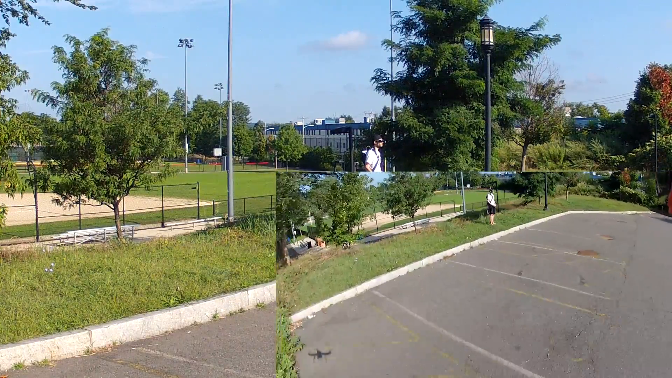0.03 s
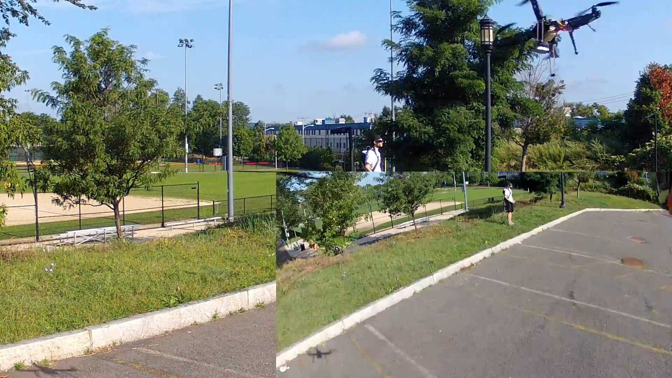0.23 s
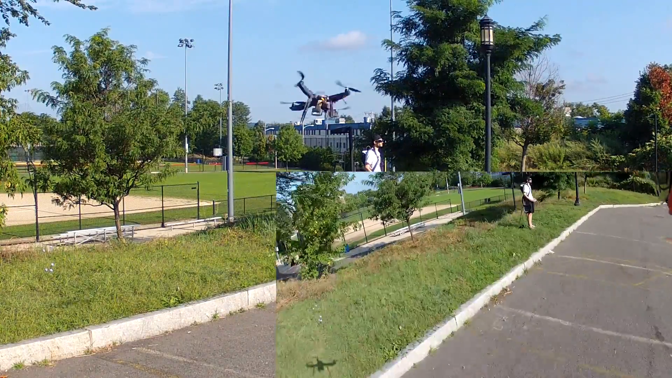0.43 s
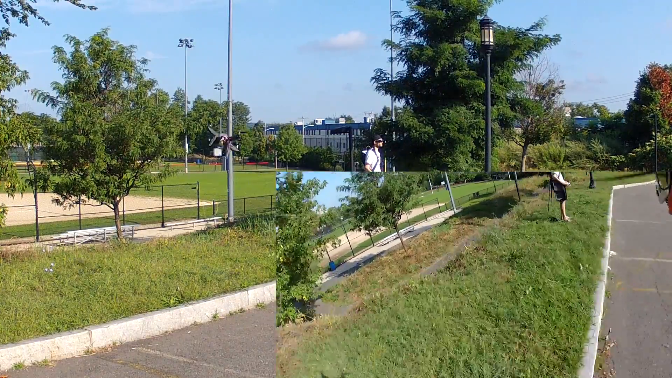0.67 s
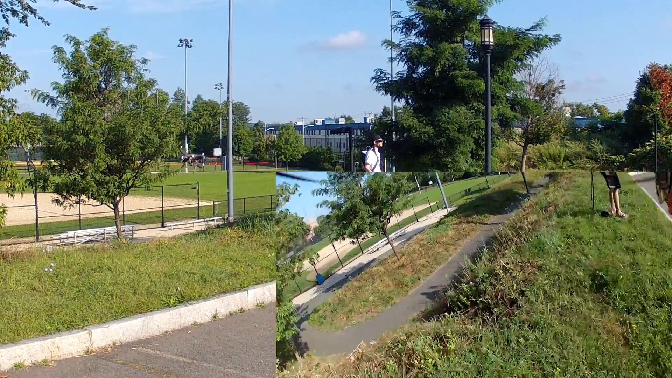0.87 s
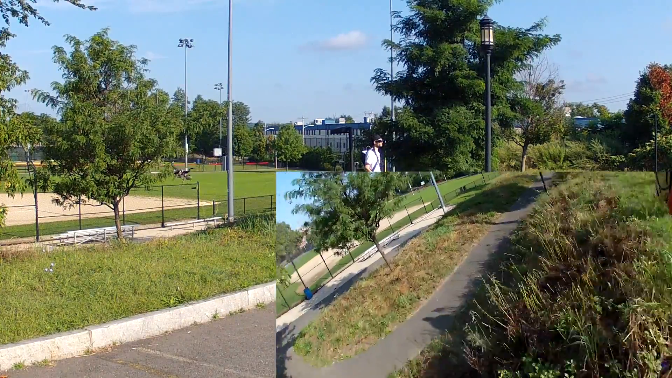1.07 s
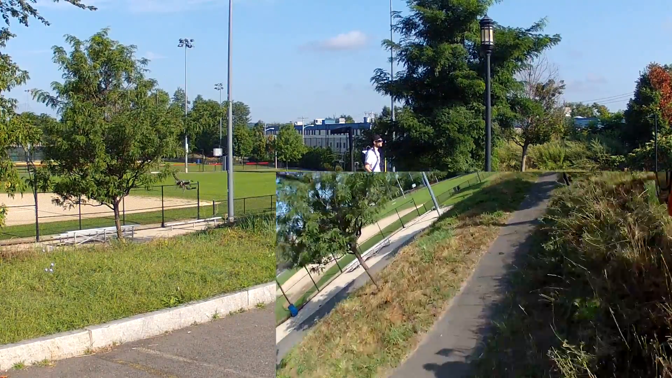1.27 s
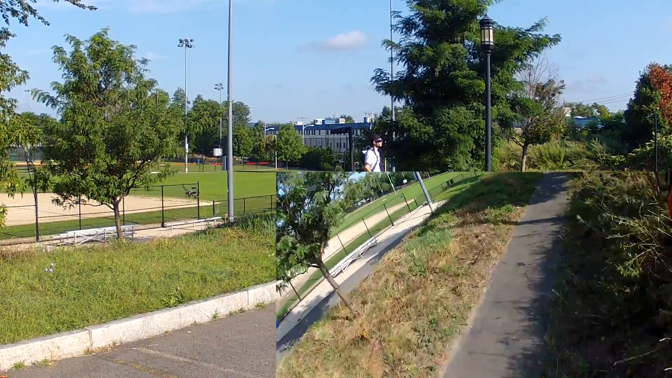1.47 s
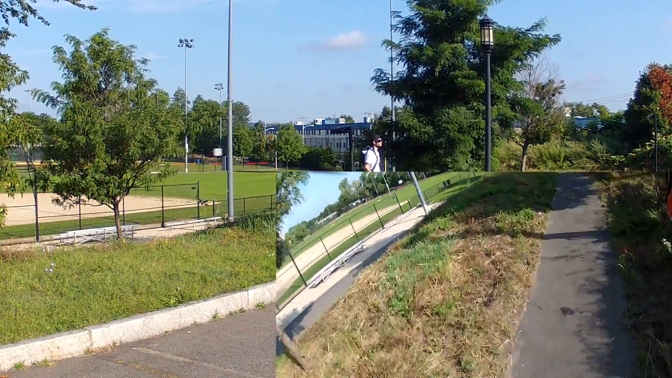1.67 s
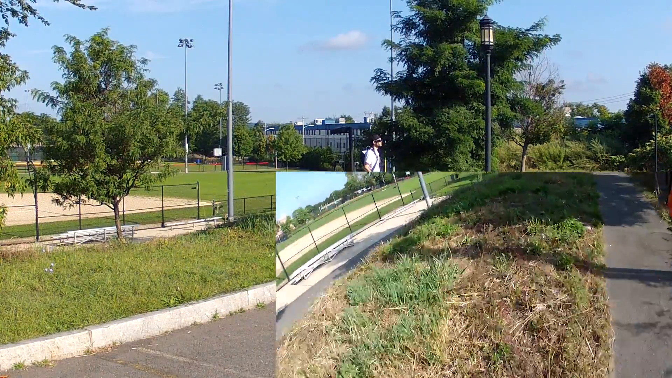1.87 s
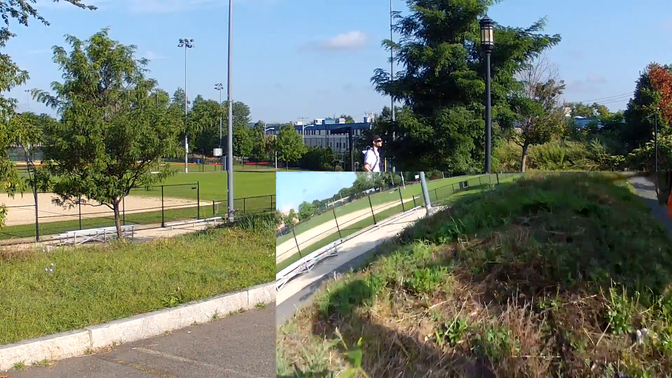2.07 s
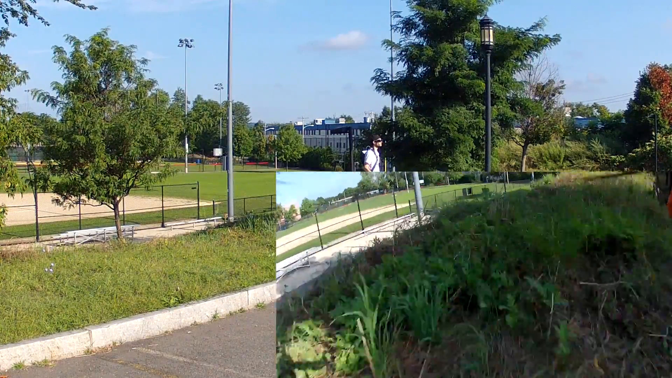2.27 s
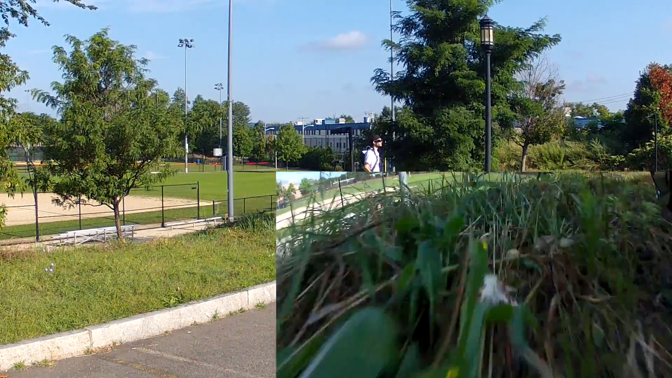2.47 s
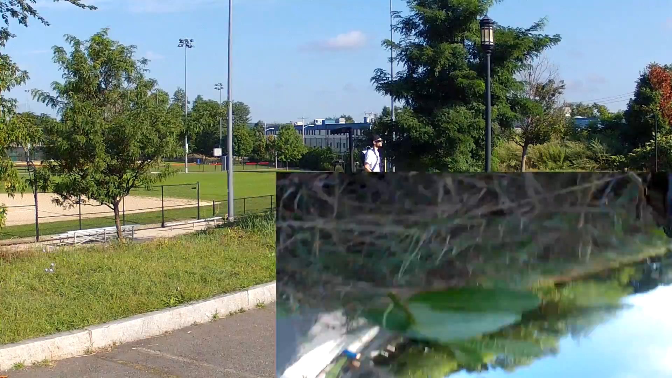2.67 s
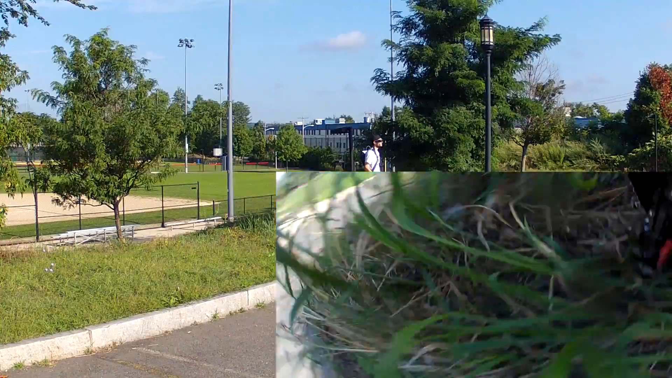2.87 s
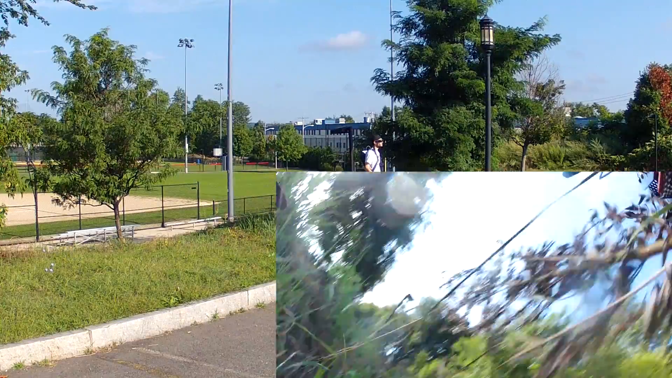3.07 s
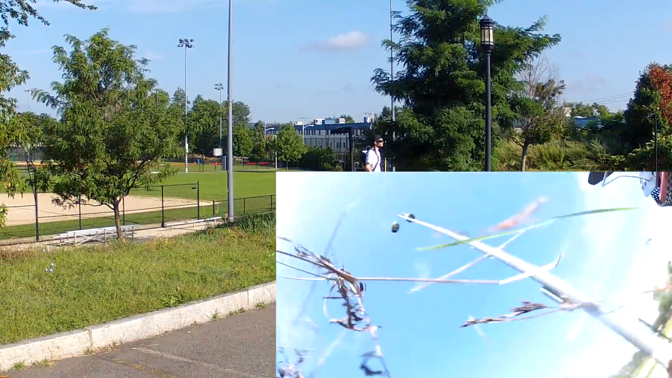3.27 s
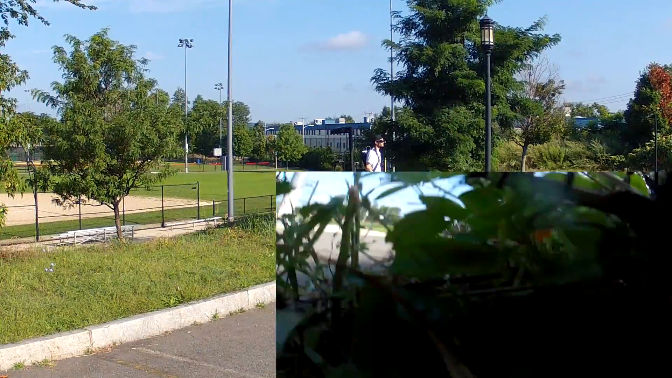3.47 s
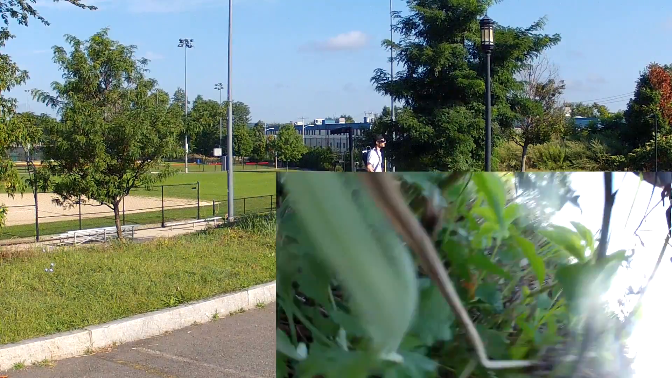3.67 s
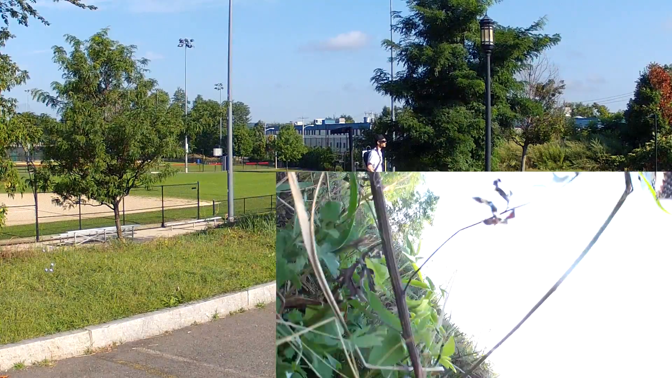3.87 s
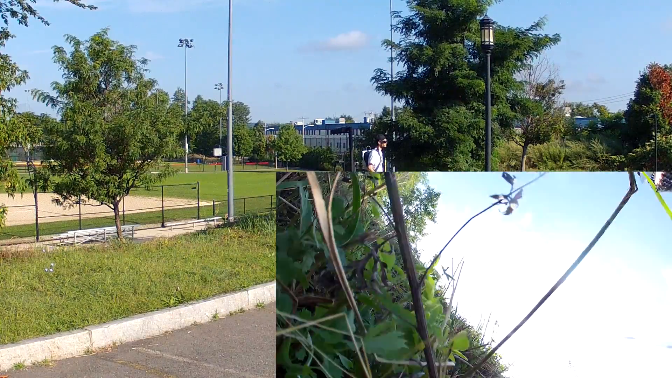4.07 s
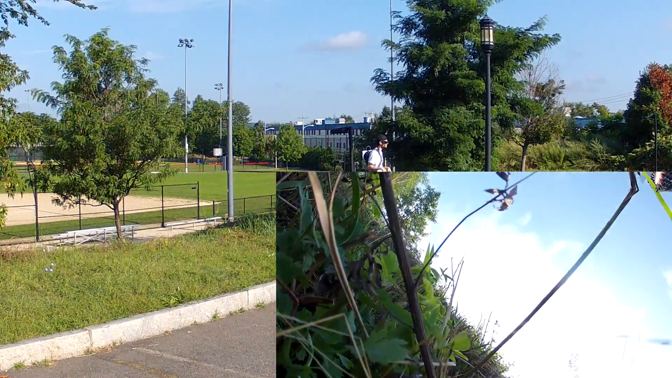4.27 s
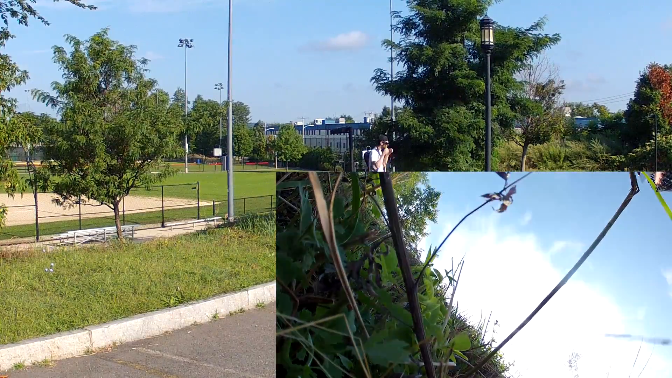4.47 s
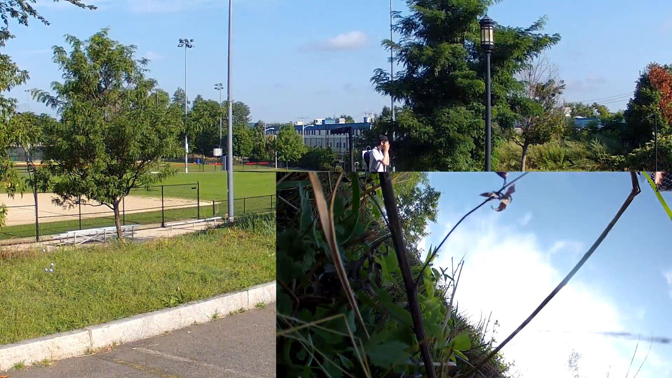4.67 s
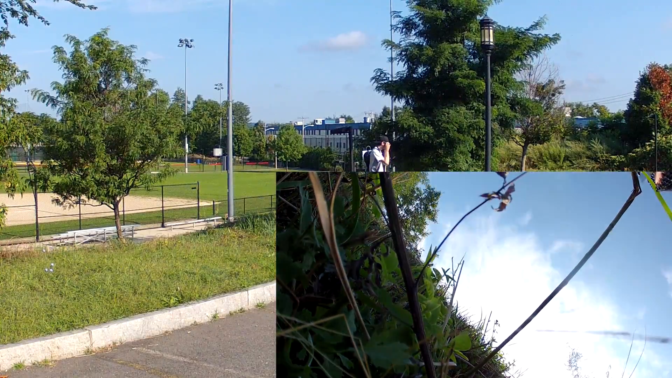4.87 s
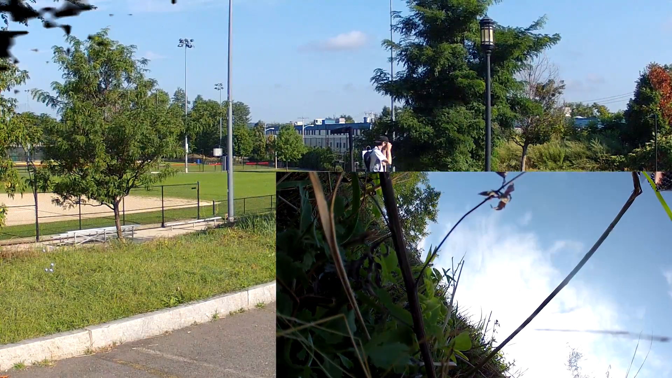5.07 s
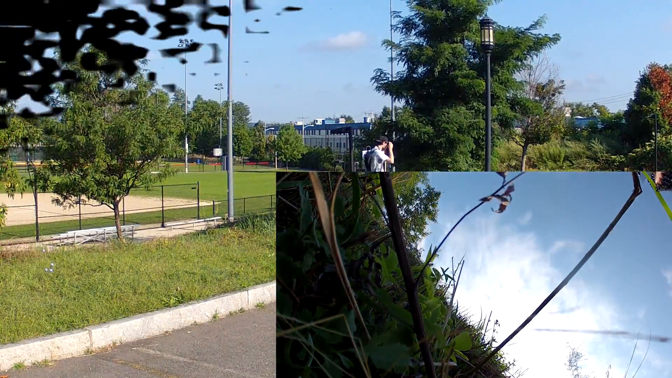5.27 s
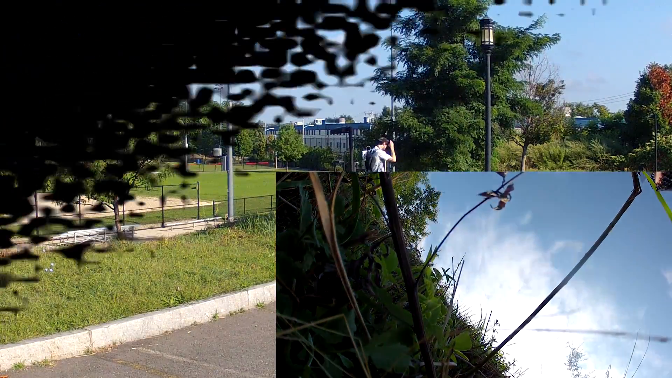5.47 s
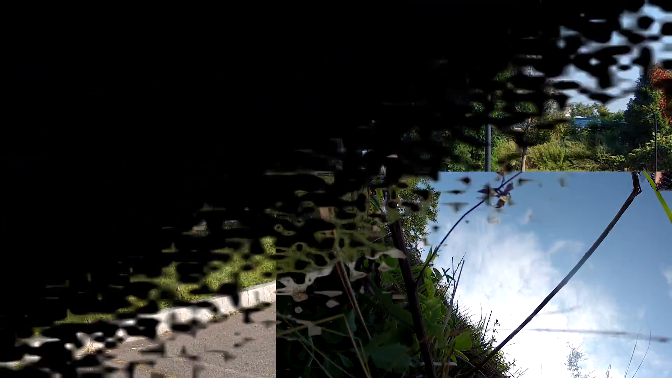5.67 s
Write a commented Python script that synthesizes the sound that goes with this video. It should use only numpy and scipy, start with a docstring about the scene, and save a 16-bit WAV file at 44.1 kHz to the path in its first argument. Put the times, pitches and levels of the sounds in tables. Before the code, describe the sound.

Close, gritty, overloaded onboard sound outdoors in a park. Two slightly detuned rotors drone under buffeting air and casing hiss, thumping now and then. Stems snap sharply on impact, plants scrape the plastic, low knocks tumble unevenly, and rotors sputter twice. A last heavy crack and rustles end it near four seconds, leaving very quiet distant rumble, high thin buzzing and soft falling chirps.

```python
"""A park, heard by a small camera on a quadcopter: blade hum and buffeting air, then a tumble through grass
and brush, then quiet with a thin buzz and a cricket. Rotors are harmonics of the blade pass; air, plants and
park are shaped noise; blows are short bursts and pushes. The camera samples sound slowly and holds each value,
which mirrors the spectrum into the treble."""
import sys
import numpy as np
from scipy import signal
from scipy.fft import rfft, irfft, next_fast_len
from scipy.io import wavfile
from scipy.ndimage import uniform_filter1d

SR = 44100
rng = np.random.default_rng(int(sys.argv[2]) if len(sys.argv) > 2 else 0)


def master_out(mix):
    """Clip the mix to full scale and print it as 16-bit PCM to the path in sys.argv[1]."""
    frames = np.transpose(np.atleast_2d(mix))
    ceiling = np.clip(frames, -1, 1)
    pcm = np.round(ceiling * 32767).astype(np.int16)
    wavfile.write(sys.argv[1], SR, pcm)


N = 252043
T = np.arange(N) / SR
CASING_HZ, CASING_WIDTH_HZ = 1070, 170
# spectrum of plants on the casing: freq_hz, density_db
SCRAPE_SPECTRUM = [(290, -34), (500, -17.5), (875, -6), (1070, -6), (1340, -9), (1840, -12), (4460, -11),
                   (5700, -15.5)]


def amp(db):
    """Amplitude ratio of a level in dB."""
    return 10 ** (np.asarray(db) / 20)


def evened(x):
    """x at unit RMS."""
    return x / np.sqrt(np.mean(x ** 2) + 1e-20)


def add(mix, start_s, sound):
    """Add sound into mix in place, cut at the end."""
    part = mix[round(start_s * SR):][:len(sound)]
    part += sound[:len(part)]


def curves(rows):
    """A mask that is 1 while the table lasts, and the table's columns at every sample."""
    s, *columns = np.transpose(rows)
    inside = uniform_filter1d(1. * ((T > s[0]) & (T < s[-1])), size=600, mode="nearest")
    return inside, [np.interp(T, s, column) for column in columns]


def coloured(x, spectrum):
    """x filtered by a spectrum given as points, at unit RMS."""
    point_hz, point_db = np.transpose(spectrum)
    size = next_fast_len(len(x))
    hz = np.fft.rfftfreq(size, 1 / SR)
    gain_db = np.interp(np.log(hz + 1), np.log(point_hz + 1), point_db)
    return evened(irfft(rfft(x, size) * amp(gain_db), size)[:len(x)])


def resonate(x, hz, width_hz):
    """A two-pole resonance of peak gain 1."""
    return signal.lfilter(*signal.iirpeak(hz, hz / width_hz, SR), x)


def lumps(per_s, depth_db):
    """A gain that wanders about per_s times a second."""
    knots = rng.standard_normal(2000)
    return amp(depth_db * np.interp(T * per_s % 1999, np.arange(2000), knots))


def crackle(per_s, spread_db):
    """Random clicks, a few of them large, at unit RMS."""
    chance = rng.random(N)
    size = rng.exponential(1, N)
    sign = rng.choice([-1., 1.], N)
    return evened((chance < per_s / SR) * sign * amp(spread_db * np.minimum(size, 4)))


def park_wash():
    """Distant wash: noise of the park's spectrum, slightly uneven."""
    # freq_hz, density_db
    park_spectrum = [(12, -54.5), (20, -25.5), (69, -1.5), (177, -8), (212, -7), (267, -10), (299, -6.5),
                     (385, -13), (821, -16), (3100, -30), (4800, -28), (6240, -50), (10600, -120)]
    return amp(-56.5) * coloured(rng.standard_normal(N) * lumps(12, 0.57), park_spectrum)


def thin_buzz():
    """High harmonics of a steady pulse rate, each wavering in level, with a band of hiss around them."""
    # multiple of pulse rate, level_db
    buzz_partials = [(32, -85), (34, -86), (36, -84), (38, -84), (39, -76), (40, -79), (41, -68), (42, -72),
                     (43, -70), (44, -69), (45, -69), (46, -76), (47, -70)]
    pulse_rate_hz = 125.8
    hiss_hz, hiss_width_hz, hiss_db = 5350, 600, -69
    out = np.zeros(N)
    for k, db in buzz_partials:
        wave = np.cos(2 * np.pi * round(k) * pulse_rate_hz * T + .6 * k ** 2)
        out += np.sqrt(2) * amp(db) * lumps(15, 1.5) * wave
    hiss = resonate(rng.standard_normal(N), hiss_hz, hiss_width_hz)
    return out + amp(hiss_db) * evened(resonate(hiss, hiss_hz, 1500.))


def cricket():
    """Chirps of short pulses that fall in pitch; pulses tend to strengthen through a chirp."""
    # start_s, pulse count
    chirps = [(4.2, 3), (4.603, 2), (4.98, 3), (5.381, 3)]
    gap_s, gap_spread_s = .045, .003
    last_db, swell_db, spread_db = -61, 2.5, 1.5
    t = T[:1100]
    pulse = np.sin(2 * np.pi * np.cumsum(4560. - 12000 * t) / SR) * np.hanning(len(t))
    out = np.zeros(N)
    for start_s, count in chirps:
        for k in range(count):
            late, strong = rng.standard_normal(2)
            db = last_db + swell_db * (k + 1 - count) + spread_db * strong
            add(out, start_s + k * (gap_s + gap_spread_s * late), amp(db) * pulse)
    return out


def air(push):
    """Low buffeting, and hiss from turbulence puffed by every blade pass, which rings the casing."""
    # time_s, buffet_db, hiss_db
    air_levels = [(0.0, -28.5, -32), (.1, -22, -26.5), (.19, -21.5, -22), (.33, -20, -21),
                  (1.2, -19.5, -19.5), (1.65, -21.5, -23.5), (2.2, -19, -25.5), (2.5, -18.5, -25.5),
                  (2.58, -18.5, -32.5), (2.66, -17.5, -26.5)]
    # freq_hz, density_db
    buffet_spectrum = [(15, -45), (25, -23), (70, -9), (130, -5), (300, -7), (500, -10.5), (900, -16.5),
                       (1170, -39)]
    # freq_hz, density_db
    hiss_spectrum = [(410, -10.5), (700, -9.5), (890, -2.5), (1000, 0.5), (1360, -3), (2450, -5.5),
                     (5000, -13), (5700, -13.5)]
    puffs = np.exp(0.2 * evened(push))
    on, (buffet_db, hiss_db) = curves(air_levels)
    buffet = coloured(rng.standard_normal(N) * lumps(60, 2.14), buffet_spectrum)
    grit = rng.standard_normal(N) + 0.5 * crackle(1400, 3.76)
    hiss = coloured(grit * puffs * lumps(150, 0.83), hiss_spectrum)
    hiss += 0.1 * evened(resonate(hiss, CASING_HZ, CASING_WIDTH_HZ))
    return on * (amp(buffet_db) * buffet + amp(hiss_db) * hiss)


def motor_whines():
    """Thin sine whines, wavering in pitch and level, that fade in and out."""
    # pitch_hz, level_db, end_s
    whines = [(5290, -44, 1.75), (5630, -46, 2.5)]
    fade_s = 0.34
    out = np.zeros(N)
    for hz, db, end_s in whines:
        phase = 2 * np.pi * np.cumsum(hz * lumps(17, -0.4)) / SR
        fade = np.clip(np.minimum(T, end_s - T) / fade_s, 0, 1)
        out += fade * amp(db) * lumps(30, 3.8) * np.cos(phase)
    return out


def tumble():
    """Leaves and stems drag over the casing in dense uneven clicks; the frame carries a lumpy rumble."""
    # start_s, length_s, scrape_db, casing_ring_db, rumble_db
    contacts = [(2.628, .075, -8, -32, -14.5), (2.714, .075, -13, -15.5, -17.5),
                (2.814, .055, -29, -75, -39), (2.873, .05, -19, -22.5, -11), (2.943, .045, -21, -43, -25),
                (3.014, .075, -29.5, -38, -43), (3.084, 0.033, -48, -47, -25.5),
                (3.118, 0.038, -42.5, -49.5, -15.5), (3.198, .062, -35, -30.5, -23),
                (3.268, 0.043, -42.5, -49, -22), (3.338, 0.078, -41, -52, -19.5),
                (3.432, .052, -24.5, -28.5, -19), (3.498, .075, -16, -26.5, -21.5),
                (3.606, .07, -20, -30.5, -23.5), (3.697, .02, -18, -29, -15), (3.74, .035, -55, -46, -30.5),
                (3.776, .04, -25, -55, -31), (3.844, .03, -32.5, -53, -37.5),
                (3.896, .04, -27, -34.5, -27.5)]
    # freq_hz, density_db
    rumble_spectrum = [(15, -37.5), (25, -6), (179, -0.5), (405, -2), (525, -4.5), (647, -5.5),
                       (855, -12.5), (1040, -14.5), (1600, -26), (2080, -49), (3520, -120)]
    # scrape, casing ring, rumble: fast build-up and let-go [dB/s], then a fainter, slower tail [dB, dB/s]
    grab_db_per_s = np.array([800.5, 898.5, 1499.5])[:, None]
    release_db_per_s = np.array([802, 499.5, 902])[:, None]
    tail_db = np.array([-21.5, -22.5, -25.5])[:, None]
    tail_db_per_s = np.array([69.5, 90, 59])[:, None]
    t = T[::16]
    levels = np.zeros((3, len(t)))
    for start_s, length_s, *layer_db in contacts:
        before = np.maximum(start_s - t, 0)
        after = np.maximum(t - start_s - length_s, 0)
        decay_db = np.maximum(-release_db_per_s * after, tail_db - tail_db_per_s * after)
        shape_db = decay_db - grab_db_per_s * before
        levels = np.hypot(levels, amp(layer_db)[:, None] * amp(shape_db))
    drag = (.5 * rng.standard_normal(N) + crackle(2500, 3)) * lumps(120, 2.6)
    scrape = coloured(drag, SCRAPE_SPECTRUM)
    ring = resonate(drag, CASING_HZ, CASING_WIDTH_HZ)
    ring = evened(resonate(ring, CASING_HZ, 400.) * lumps(70, 4.0))
    jolts = rng.standard_normal(N) + 0.36 * crackle(400, 2.5)
    rumble = coloured(jolts * lumps(60, 3.0), rumble_spectrum)
    return sum(np.interp(T, t, level) * layer for level, layer in zip(levels, [scrape, ring, rumble]))


def snaps():
    """Sharp cracks, mostly stems snapping: dying noise bursts; strong and dull ones ring the casing most."""
    # time_s, level_db, colour_hz
    cracks = [(2.0491, -18, 1503), (2.2633, -14, 1470), (2.5119, -15, 1498), (2.596, -20, 1840),
              (2.6372, -10, 4470), (2.652, 4, 4920), (2.6656, -5, 1847), (2.6873, -14, 3310),
              (2.715, -10, 1618), (2.772, -6, 2160), (2.827, -34.5, 4010), (2.8493, -10.5, 3360),
              (2.8816, -0.5, 3656), (2.949, -8, 4040), (2.9833, -8, 4210), (3.047, -23.5, 4060),
              (3.1584, -22, 1523), (3.1756, -28.5, 2480), (3.2079, -19.5, 1640), (3.2162, -25, 2457),
              (3.2524, -26.5, 1475), (3.3146, -33, 1500), (3.3957, -27.5, 1480), (3.43, -29.5, 1730),
              (3.4385, -15, 2230), (3.4625, -15.5, 1806), (3.495, -15.5, 2300), (3.5116, -9, 3640),
              (3.609, -22, 3163), (3.6429, -15, 2920), (3.7061, 7, 1490), (3.733, -28.5, 3765),
              (3.7532, -22.5, 3865), (3.777, -21.5, 2240), (3.8013, -24.5, 2540), (3.8325, -26, 3560),
              (3.8547, -21, 2216), (3.8924, -14, 4640), (3.9101, -7.5, 2270), (3.9172, -8.5, 4544),
              (4.093, -49, 3000), (4.139, -50.5, 3200), (4.22, -57, 2500), (4.272, -53, 3200)]
    rise_s, t60_s, ring_t60_s = 0.0069, 0.015, 0.027
    ring_db, ring_per_db, ring_db_per_octave = -0.5, 0.9, -12.5
    t = T[:4000]
    noise = coloured(rng.standard_normal(4000 * len(cracks)), SCRAPE_SPECTRUM).reshape(-1, 4000)
    rise = np.minimum(t / rise_s, 1) ** 3.2
    shape = amp(-60 * np.maximum(t - rise_s, 0) / t60_s) * rise
    ring = amp(-60 * t / ring_t60_s) * np.sin(2 * np.pi * CASING_HZ * t)
    out = np.zeros(N)
    for time_s, db, hz, burst in ((*row, burst) for row, burst in zip(cracks, noise)):
        burst = evened(0.45 * burst + resonate(burst, hz, 800.))
        add(out, time_s - 0.78 * rise_s, amp(db) * shape * burst)
        octaves = np.log2(hz / CASING_HZ)
        add(out, time_s, amp(ring_db + ring_per_db * db + ring_db_per_octave * octaves) * ring)
    return out


def thumps():
    """Blows felt through the frame: a cycle or so of low push under a sine arch."""
    # start_s, level_db, pitch_hz
    frame_blows = [(0.163, -6, 353), (0.316, -9, 199), (0.905, -10, 178), (1.299, -3, 608),
                   (1.564, -4, 180), (1.674, -11, 196), (2.091, -7.5, 676), (2.264, -4, 300),
                   (2.454, -8, 308), (2.774, -3.5, 353), (2.875, -10, 373), (2.899, -5, 373),
                   (2.918, -5, 342), (2.964, -9, 193), (3.037, -13, 480), (3.092, -13, 390),
                   (3.12, -4, 328), (3.155, 3, 620), (3.266, -8, 210), (3.348, -6, 300), (3.395, -16, 342),
                   (3.429, -5, 713), (3.462, -2, 520), (3.702, -1.5, 172), (3.717, -6.5, 191),
                   (3.771, -14, 105), (4.113, -39, 500)]
    length_cycles = 1.41
    t = T[:4000]
    out = np.zeros(N)
    for start_s, db, hz in frame_blows:
        cycles = t[t < length_cycles / hz] * hz
        add(out, start_s, amp(db) * np.sin(2 * np.pi * cycles) * np.sin(np.pi * cycles / length_cycles))
    return out


def squeaks():
    """Brief steady high tones with softened ends."""
    # start_s, length_s, pitch_hz, level_db
    tones = [(3.008, 0.027, 4030, -29.5), (3.024, 0.0075, 3980, -31), (3.043, .024, 4000, -36)]
    t = T[:4000]
    out = np.zeros(N)
    for start_s, length_s, hz, db in tones:
        u = t[t < length_s]
        add(out, start_s, amp(db) * np.sin(2 * np.pi * hz * u) * signal.windows.tukey(len(u), .4))
    return out


def rotors():
    """Each rotor hums in harmonics of its blade-pass rate; also returns the push that puffs the air."""
    # one table per stretch in which a rotor stands out, the last two snagged rotors spinning up again:
    # time_s, blade_pass_hz, level_db
    stretches = [
        [(.05, 186.5, -33), (.17, 185, -28.5), (.21, 184.7, -22.5), (.5, 190, -21.5), (1.0, 187.8, -23),
         (1.63, 185.4, -21.5), (1.78, 200.6, -19), (2.1, 200.3, -28), (2.36, 208.7, -25), (2.46, 200.7, -28.5),
         (2.66, 207, -21)],
        [(.05, 178, -31), (.17, 180, -28.5), (.21, 180, -25.5), (.4, 174.8, -22), (.65, 169.1, -20),
         (.85, 174, -22.5), (1.2, 170.3, -22.5), (1.45, 171.4, -21.5), (1.62, 180.8, -22), (1.9, 176.2, -26),
         (2.3, 169.4, -25), (2.66, 164.4, -23)],
        [(1.95, 115, -28.5), (2.1, 126.9, -28), (2.25, 131.6, -26), (2.4, 152, -26)],
        [(2.37, 143, -34), (2.43, 157.5, -25), (2.5, 159, -25), (2.55, 200, -28), (2.63, 206, -33)],
        [(3.04, 70, -30), (3.085, 150, -20.5), (3.15, 215, -28.5)],
        [(3.2, 85, -28), (3.27, 115, -25.5), (3.345, 170, -15.5), (3.4, 175, -27)],
    ]
    # multiple of blade pass, level_db
    blade_partials = [(1, -0.5), (2, -13), (3, -18.5), (4, -25.5)]
    # per stretch: lift of the second partial (labouring rotors groan), level wander, pitch wander [dB]
    strains_db = [0, 0, 0, 16, 6, 6]
    flutters_db = [1.2, 1.2, 2.5, 1.5, 6, 6]
    wavers_db = [.08, .08, .15, .1, 1.6, 1.6]
    hum, push = np.zeros(N), np.zeros(N)
    for rows, strain_db, flutter_db, waver_db in zip(stretches, strains_db, flutters_db, wavers_db):
        on, (hz, db) = curves(rows)
        phase = 2 * np.pi * (np.cumsum(hz * lumps(45., waver_db)) / SR + rng.random())
        wave = np.zeros(N)
        for k, partial_db in blade_partials:
            lift_db = strain_db * (round(k) == 2)
            wave += amp(partial_db + lift_db) * np.cos(round(k) * phase)
        hum += on * amp(db) * lumps(40., flutter_db) * np.sqrt(2) * wave
        push -= on * amp(db) * np.cos(phase + 0.58)
    return hum, push


def scene():
    """Park, air, plants and quadcopter summed in one channel."""
    hum, push = rotors()
    park = park_wash() + thin_buzz() + cricket()
    plants = tumble() + snaps() + thumps() + squeaks()
    return (park + air(push) + motor_whines() + plants + hum)[None]


def record(dry):
    """A limiter ducks after loud peaks; slow sampling with each value held four times; then the band limit."""
    up, down = 40, 147  # SR to 12000 samples a second
    peak_db = 20 * np.log10(abs(dry[0]) + 1e-9)
    fall_db = T * 350.0  # fall of the held peak
    held_peak_db = np.maximum.accumulate(peak_db + fall_db) - fall_db
    over_db = np.maximum(held_peak_db + 7.0, 0)
    late_over_db = np.roll(uniform_filter1d(over_db, size=80), 60)
    ducked = dry[0] / amp(0.59 * late_over_db)
    guard = signal.firwin(301, 5720, window=("kaiser", 4.1), fs=SR)  # the filter before sampling
    guard[150] += amp(-11.)  # it leaks a little
    guarded = np.pad(signal.oaconvolve(ducked, guard, "same"), (0, -N % down))
    slow = signal.resample(guarded, -(-N // down) * up)
    steps = np.repeat(np.clip(slow, -1, 1), 4)
    held = signal.resample_poly(steps, down, 4 * up)[:N]
    edge = signal.firwin(301, 15300, window=("kaiser", 9), fs=SR)
    return np.clip(signal.oaconvolve(held, edge, "same"), -1, 1)[None]


dry = scene()
out = record(dry)
master_out(out)
```